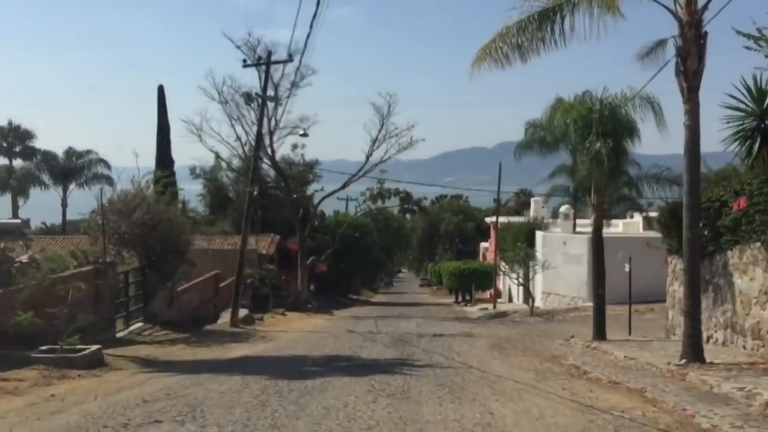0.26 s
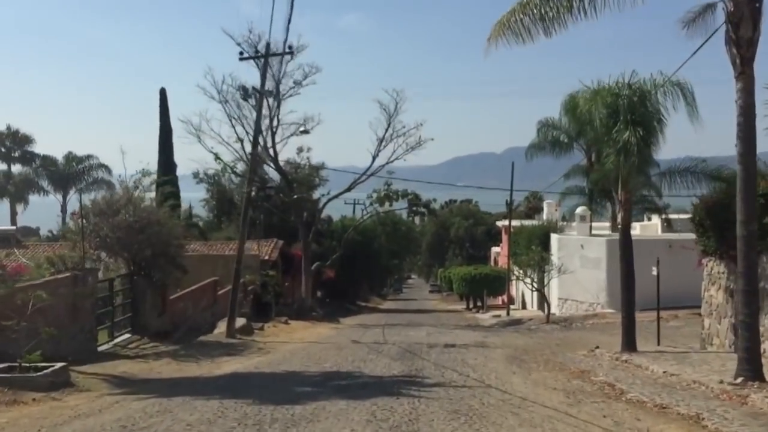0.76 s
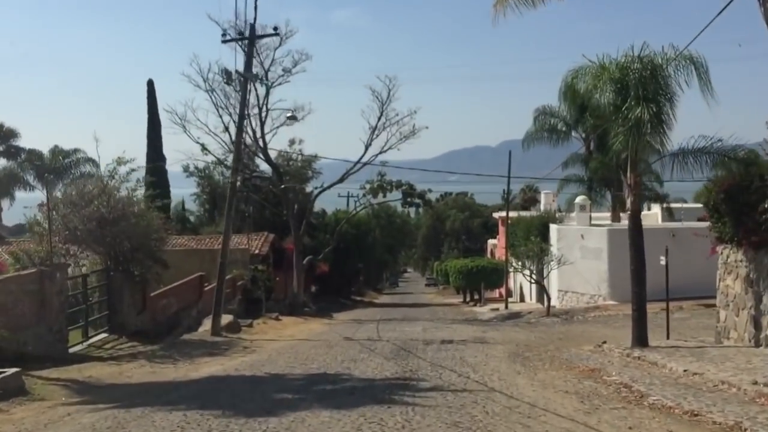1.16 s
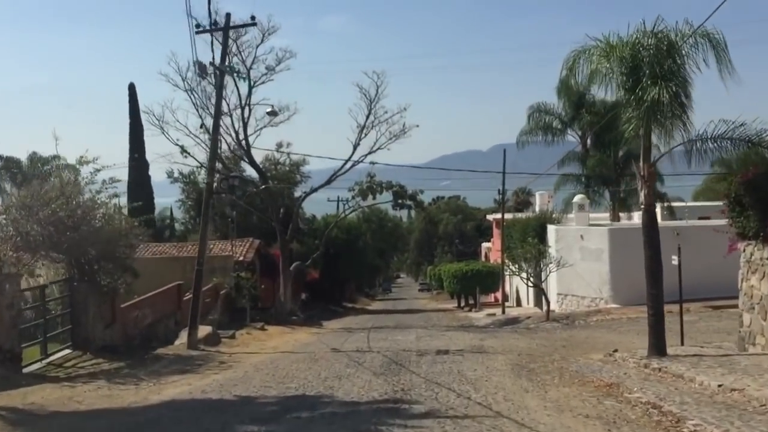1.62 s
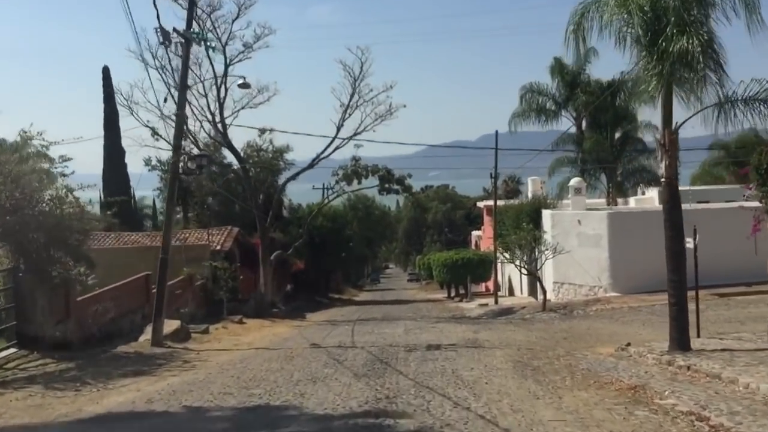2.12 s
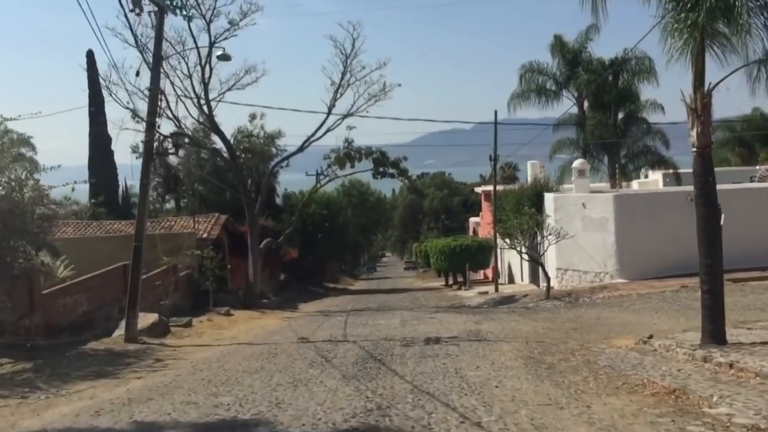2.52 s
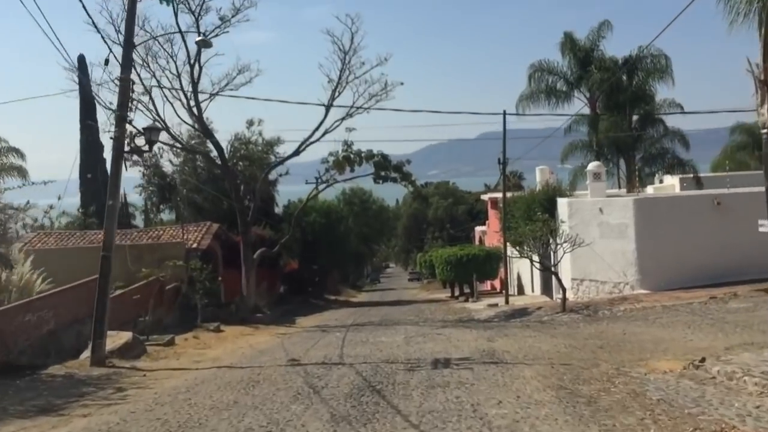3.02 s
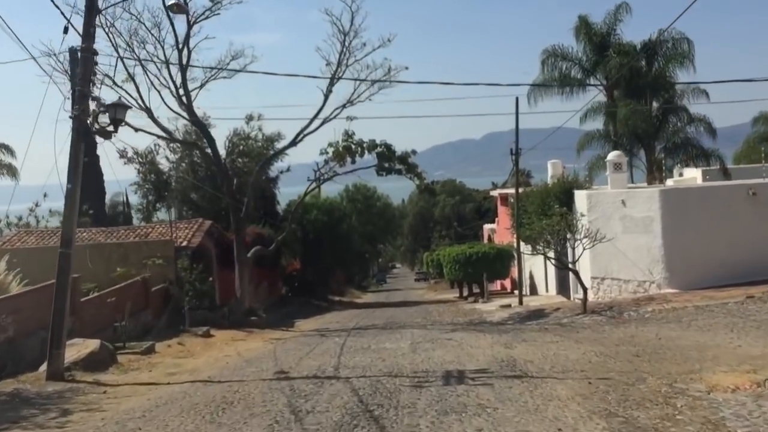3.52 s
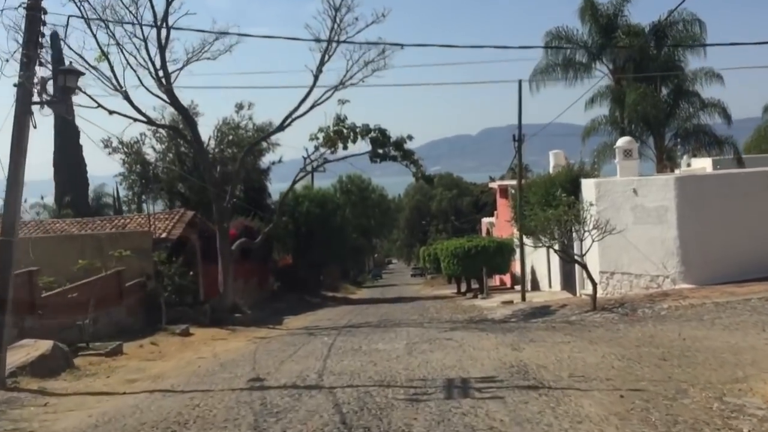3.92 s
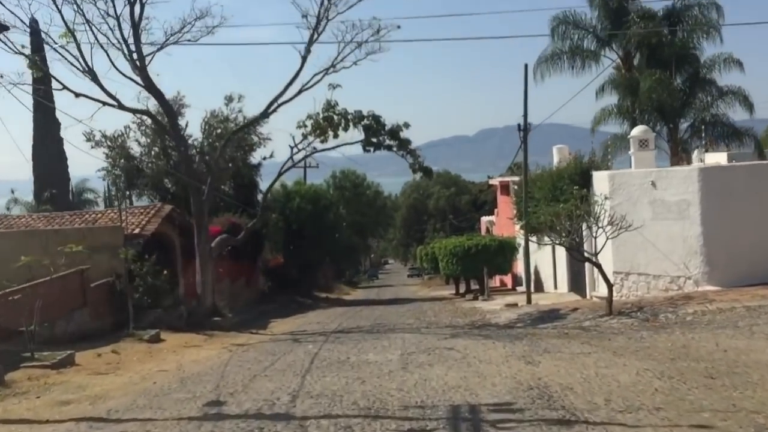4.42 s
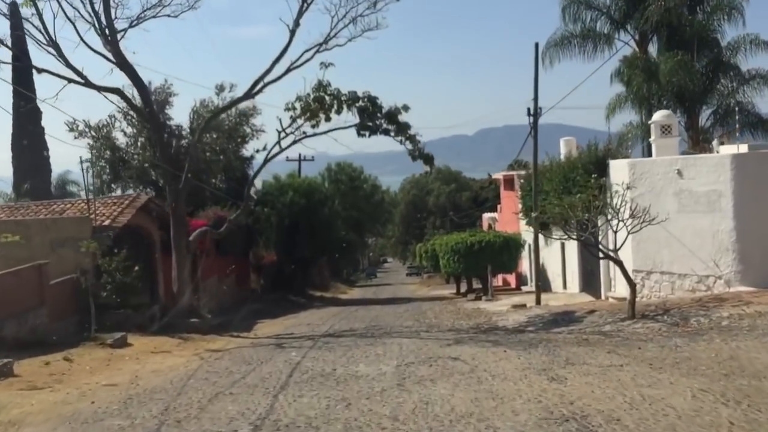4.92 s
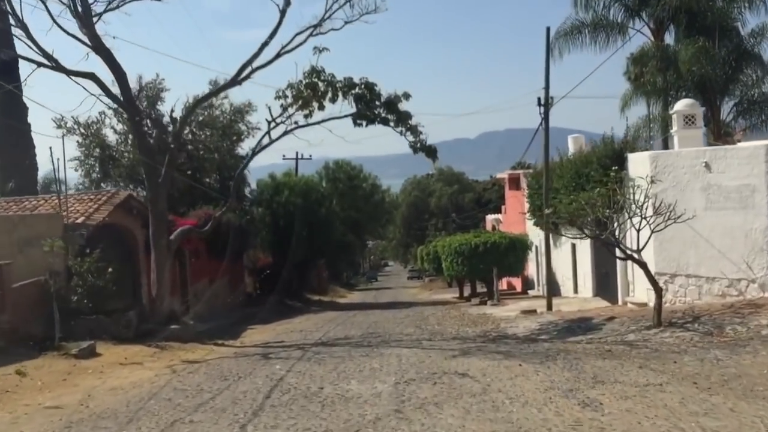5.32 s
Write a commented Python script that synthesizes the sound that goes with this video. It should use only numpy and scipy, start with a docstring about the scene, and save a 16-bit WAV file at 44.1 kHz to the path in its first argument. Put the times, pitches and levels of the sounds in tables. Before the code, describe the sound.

Slow drive on a cobbled street heard in the cabin: deep uneven tyre rumble, ticking loose trim, a few faint birds outside.

```python
"""A car rolls slowly over cobbles, heard from inside: stone blows, as random impulses, boom, thud and roar.
Narrow resonances add the drone of the cabin air and the note of the tyre cavities.
Plastic trim taps and chatters as noise bursts and decaying modes, loose things scrape, small metal tinks.
Birds whistle and chirp outside in gliding tones, echoed by the road and house fronts; faint steady hiss."""
import sys
import numpy as np
from scipy import signal
from scipy.fft import rfft, irfft, next_fast_len
from scipy.io import wavfile
from scipy.ndimage import uniform_filter1d, map_coordinates

SR = 44100
rng = np.random.default_rng(int(sys.argv[2]) if len(sys.argv) > 2 else 0)


def wrap_up_sound(samples):
    """Save the sound to the file named by the first command line argument, as 16-bit audio."""
    columns = np.atleast_2d(samples).T
    # keep every value between -1 and 1, then stretch to whole-number steps
    tamed = np.clip(columns, -1, 1)
    steps = np.round(tamed * 32767).astype(np.int16)
    wavfile.write(sys.argv[1], SR, steps)


N = 245047

# Steady air and microphone noise. Each row: frequency in Hz, relative dB per Hz.
HISS_SPECTRUM = [(2000, -4.5), (4000, -10.5), (6500, -4), (10000, -5), (15500, -13)]

# Songs. Each row: whistle start in seconds, relative level in dB, opening over whistle in dB, pitch ratio.
SONGS = [(-0.04, -50, 0, 1.03), (0.24, -50.5, 2.5, 1.02), (0.508, -53, 3, .985)]
# Song opening: a high two-voiced tone, a flick, a downward slur. Each row: start after the whistle
# in seconds, length in seconds, first, middle and last pitch in Hz, relative level in dB, roughness 0-1.
OPENING_NOTES = [(-.078, 0.053, 5380, 5414, 5560, -10.5, 0.15), (-.062, .05, 7680, 7740, 7760, -23, 0.4),
                 (-.046, .016, 7650, 7350, 7050, -18, .6), (-.037, .018, 5950, 5750, 5500, -18.5, 0.4),
                 (-.029, .014, 4850, 4650, 4500, -14, .5), (-.012, .021, 4550, 4330, 4100, -9.5, 0.4)]
# Rest of the song: rising whistle, held top, buzz, softer second rise. Rows as in OPENING_NOTES.
WHISTLE_NOTES = [(-.004, .106, 2440, 2630, 3130, 0, .05), (.095, .055, 3100, 3110, 3100, -15, .25),
                 (.104, .034, 3750, 4050, 4380, -10, .75), (.152, .09, 2860, 3010, 3280, -12, .35)]
# Falling two-voiced chirp of a second bird. Rows as in OPENING_NOTES, start counted from the chirp.
CHIRP_NOTES = [(0, .028, 5350, 5480, 5620, -5, .15), (.02, .02, 3700, 4050, 4800, -3, .6),
               (.028, .036, 5220, 5150, 5050, 4.5, .2), (.04, .12, 4800, 3850, 3150, 1.5, .9)]
# Chirps. Each row: start in seconds, relative level in dB.
CHIRPS = [(0.641, -72), (1.512, -68), (2.315, -70.5), (3.04, -72), (3.83, -70.5), (4.7, -79), (5.484, -76)]
# Sharp chips. Each row: start in seconds, middle pitch in Hz, relative level in dB,
# share the pitch falls on each side of the middle.
CHIPS = [(3.789, 6300, -55.5, .3), (4.785, 3190, -53.5, 0.068)]
CHIP_S, CHIP_ROUGHNESS = 0.018, 0.75
NOTE_DB_PER_OCTAVE = 9  # louder as the pitch climbs
WAVER_KNOTS_PER_S, WAVER_PITCH_SHARE, FLUTTER_DB = 110, .006, 2.8  # unsteady pitch and level
# Echoes from house fronts. Each row: delay in seconds, level in dB.
WALLS = [(0.039, -17), (0.086, -20), (0.12, -21)]
GROUND_DELAY_S, GROUND_DB = .0038, -8.5  # bounce off the road: gliding notes swell and dip

# Taps of small metal. Each row: start in seconds, relative level in dB.
TINKS = [(2.32, -74), (3.451, -59), (4.107, -65), (4.702, -66.5), (5.176, -67.5), (5.23, -71)]
# Modes of the metal piece. Each row: frequency in Hz, relative level in dB, t60 in seconds.
METAL_MODES = [(8400, -15, .05), (8860, -2.5, 0.072), (8900, -10, .06), (12300, -17.5, .03),
               (15450, -18.5, .03)]

# Slide of a loose object. Each row: time in seconds, relative level in dB.
SLIDE_LEVEL = [(2.97, -75), (3.0, -49), (3.03, -51), (3.065, -55), (3.105, -47), (3.12, -66), (3.16, -71.5)]
# Brief rubs of loose things. Each row: middle in seconds, length in seconds, relative peak level in dB.
SCUFFS = [(1.126, 0.079, -68), (2.706, 0.064, -68.5), (3.864, 0.089, -56.5), (4.1, 0.22, -70),
          (4.977, .05, -60.5), (5.37, 0.035, -61.5)]
# Scraping on plastic. Each row: frequency in Hz, relative dB per Hz.
SCRAPE_SPECTRUM = [(1200, -30.5), (2400, 2), (3400, -1), (5300, -7), (7000, -11.5), (9000, -12.5),
                   (12000, -24), (15500, -23.5)]

# Ticks of loose fittings. Each row: frequency in Hz, relative dB per Hz.
TICK_SPECTRUM = [(500, -15), (1400, 10), (2100, -2), (2800, -9), (3600, -9), (5500, -15), (8000, -26),
                 (15000, -32)]
CHATTER_DB = -81  # on smooth cobbles
CHATTER_DB_PER_ROAR_DB, CHATTER_ROAR_LIMIT_DB = 3.75, 5.5  # grows with the roar's rise, up to the limit

# Trim contacts. Each row: start in seconds, relative levels of crack, knock and snap in dB,
# ring of the struck spot in Hz, relative level of that ring in dB.
TRIM_CONTACTS = [(0.0385, -51, -38, -86, 1820, -43), (0.0558, -36, -38, -51.5, 1780, -45),
                 (0.0603, -44, -34, -72, 1800, -36.5), (0.3882, -46, -57, -70, 3260, -54),
                 (0.2162, -49, -49, -76, 1860, -42.5), (0.3931, -34, -25.5, -68, 2700, -41),
                 (0.4274, -47, -34, -69, 1120, -41), (0.6757, -50.5, -35.5, -80, 4600, -75),
                 (0.819, -53, -44.5, -70, 1720, -53), (0.848, -48.5, -42, -74, 1980, -47),
                 (1.1997, -47, -33, -69, 1900, -40.5), (1.284, -52, -37, -95, 1710, -55),
                 (1.5736, -42, -32.5, -80, 1940, -43), (1.6062, -55, -44, -79, 2680, -53.5),
                 (1.709, -52, -35.5, -82, 1340, -41.5), (2.122, -39.5, -29, -61.5, 2130, -49),
                 (2.7503, -39, -40.5, -61.5, 2670, -63), (2.887, -47, -51, -64, 2880, -45.5),
                 (2.9276, -44, -48, -68, 1470, -53), (2.9658, -45.5, -30, -86, 1500, -47),
                 (2.9998, -46, -33, -55, 2290, -44), (3.0285, -44, -53, -56, 2200, -47),
                 (3.1008, -41, -53, -68, 3030, -41), (3.3767, -34.5, -29.5, -62, 1560, -45),
                 (3.4131, -41.5, -34, -79, 2380, -49), (3.4515, -45.5, -47, -76, 1350, -48),
                 (3.489, -36, -55, -52.5, 1830, -40), (3.5336, -44, -40, -65, 2110, -52),
                 (3.55, -46, -33, -71, 3030, -48), (3.558, -45, -47, -63, 4080, -50),
                 (3.5778, -32.5, -50, -51.5, 1850, -50), (3.6237, -42, -54, -74, 1550, -52),
                 (3.791, -56, -56, -54, 4700, -64), (3.8533, -39.5, -31.5, -54, 1850, -46),
                 (4.0138, -53, -35, -68, 2830, -49), (4.092, -53, -29, -80, 1146, -55),
                 (4.1794, -39, -39, -60.5, 2140, -56), (4.5542, -37.5, -40, -67.5, 3540, -52),
                 (4.558, -39, -30.5, -76, 1520, -44), (4.592, -51.5, -33, -81, 1180, -42),
                 (4.6275, -56, -32, -84, 1380, -46), (4.6939, -42.5, -35, -53.5, 1900, -41),
                 (4.812, -51, -49, -60.5, 2690, -52.5), (4.8853, -47, -40.5, -63, 2120, -49.5),
                 (4.952, -51, -31.5, -74, 2720, -52), (4.969, -53, -44, -63, 1340, -48),
                 (4.988, -44, -31.5, -70.5, 1160, -44), (5.0231, -41.5, -30, -87.5, 1180, -45.5),
                 (5.053, -53, -45.5, -74, 1370, -45), (5.0986, -40.5, -25.5, -76.5, 1390, -46),
                 (5.112, -49.5, -53.5, -68, 1380, -54), (5.3684, -47.5, -41, -69, 3050, -52.5)]
# Modes of the plastic panels. Each row: frequency in Hz, relative level in dB, t60 in seconds.
PANEL_MODES = [(1340, -6, 0.039), (1660, 1, 0.079), (2023, 5, 0.021), (2130, -9.5, 0.0068),
               (3030, -3.5, 0.013), (3900, -4.5, 0.018), (4330, 3, 0.0032), (4720, -26.5, 0.005)]
# Hard part of a contact. Each row: frequency in Hz, relative level in dB.
CRACK_SPECTRUM = [(600, -18), (1400, 8.5), (2400, 2), (3300, -6.5), (4500, -8), (7000, -42.5)]
# Dull part of a contact. Each row: frequency in Hz, relative level in dB.
KNOCK_SPECTRUM = [(150, -34.5), (350, 15.5), (850, -3), (1300, -8), (2500, -68)]
# Bright part of a contact. Each row: frequency in Hz, relative level in dB.
SNAP_SPECTRUM = [(2500, -23), (4400, 3), (6300, 2), (8000, -7.5), (11000, -9.5), (13000, -13),
                 (16000, -29.5)]
CONTACT_T60_S = .004  # first instant of a tap
STRIKE_TRAVEL_S, STRIKE_HZ = .0014, 1000  # travel time through the panel at this pitch
STRIKE_DB = 20  # gain of the strike impulse, mixed with unit noise
REBOUND_MIN_S, REBOUND_MAX_S, REBOUND_DB = .0015, .005, -5  # panel touches once more
SPOT_SPACING_HZ, SPOT_DB = 550, 2.8  # each struck spot favours its own bands
BUZZ_KNOTS_PER_S, BUZZ_DB = 600, 3  # unevenness as panels buzz against each other
# Resonances of trim and glass. Each row: frequency in Hz, width in Hz, boost in dB (1 dB cut overall).
CABIN_RESONANCES = [(864, 66, 4.5), (1160, 33, 2), (2100, 100, 1.5), (2170, 110, 3), (2740, 110, 2),
                    (4250, 230, 3)]

# Drone of the cabin air. Each row: time in seconds, relative level in dB.
DRONE_LEVEL = [(0, -34.5), (.4, -32), (1, -35), (1.4, -35.5), (1.75, -30.5), (2.3, -33), (2.6, -29),
               (3.15, -32.5), (3.6, -30.5), (4.1, -28.5), (4.9, -30), (5.3, -31), (5.56, -23.5)]
DRONE_HZ, DRONE_WIDTH_HZ, DRONE_JOLT_SHARE = 95.9, 20, 0.7  # share of a jolt's dB it takes
# Ring of the air inside the tyres. Each row: time in seconds, relative level in dB.
CAVITY_LEVEL = [(0, -46), (0.5, -38), (0.9, -47.5), (1.4, -55.5), (2.0, -41), (2.7, -53.5), (3.5, -50.5),
                (4.2, -50), (5.1, -43), (5.56, -49.5)]

# Stretches of rough stones. Each row: middle in seconds, length in seconds,
# rise of the tyre roar in dB, rise of the floor thud in dB.
ROUGH_PATCHES = [(-0.006, 0.5, 8, 10), (0.433, 0.21, 3, 3.5), (0.796, 0.26, 4, 6.5), (1.197, 0.51, 0, 1),
                 (1.602, 0.37, 2, 2.5), (2.029, 0.26, 3.5, 3.5), (2.965, 0.34, 4, 5), (3.546, 0.52, 5.5, 7),
                 (4.101, 0.52, 5, 6.5), (4.596, 0.78, 3, 2.5), (4.975, 0.67, 5, 1.5)]
# High stones that jolt the body. Each row: middle in seconds, rise of the boom in dB.
JOLTS = [(0.03, 5.5), (1.73, 3.5), (2.562, 4), (3.381, 5), (4.042, 7), (4.283, 8), (4.489, 4.5), (4.664, 8),
         (4.891, 4), (5.06, 7), (5.179, 6.5), (5.516, 1)]
# Dull bumps of the suspension. Each row: middle in seconds, rise of the floor thud in dB.
BUMPS = [(1.359, 10.5), (1.46, 7.5), (1.993, 8), (3.58, 5.5), (3.86, 3), (3.96, 1.5), (4.089, 9.5),
         (4.16, 3.5), (4.66, 5), (4.75, 6.5)]
JOLT_S, BUMP_S = 0.1, 0.049  # lengths
# Boom of the body. Each row: time in seconds, level in dB.
BOOM_LEVEL = [(0, -27), (0.7, -27.5), (1.35, -30.5), (1.7, -27.5), (2.25, -27), (2.85, -30), (3.6, -26.5),
              (4.2, -28.5), (5.56, -27.5)]
# Modes of the body on its springs. Each row: frequency in Hz, width in Hz, relative level in dB.
BODY_MODES = [(35.5, 15, -7), (52.4, 17.7, -1.5), (75.7, 14, -7)]
# Thud of suspension and floor. Each row: frequency in Hz, relative dB per Hz.
THUD_SPECTRUM = [(90, -14), (115, 2.5), (124, 6), (150, 2.5), (175, -1.5), (203, -1.5), (222, -5),
                 (260, -10.5), (320, -17), (460, -78)]
# Tread on stone. Each row: frequency in Hz, relative dB per Hz.
ROAR_SPECTRUM = [(190, -27), (310, 3.5), (400, 3), (510, -4.5), (700, -8.5), (880, -12), (1020, -13),
                 (1300, -16), (1650, -20.5), (2400, -31.5), (3300, -37), (4400, -43.5), (7000, -49),
                 (14000, -73.5)]
ROAR_DB, THUD_DB = -49.5, -37.5  # on smooth cobbles
TOP_HZ = 15720  # band limit


def amp(db):
    """Decibels to gain."""
    return 10 ** (np.asarray(db) / 20)


def unit(x):
    """Scale to rms 1."""
    return x / np.sqrt(np.mean(x ** 2) + 1e-20)


def curve(rows):
    """Interpolate (s, value) rows to one value per sample."""
    times_s, values = np.transpose(rows)
    return np.interp(np.arange(N) / SR, times_s, values)


def wobble(knots_per_s):
    """Smooth random curve through normal knots."""
    knots = rng.standard_normal(int(N * knots_per_s / SR) + 4)
    return map_coordinates(knots, [np.arange(N) * knots_per_s / SR])


def swells(rows):
    """Sum of smooth humps, one for each (middle s, length s, height)."""
    t = np.arange(N) / SR
    return sum(height * np.cos(np.pi * np.clip((t - middle_s) / length_s, -.5, .5)) ** 2
               for middle_s, length_s, height in rows)


def filtered(x, response):
    """Multiply the spectrum of x by a response of frequency in Hz."""
    m = next_fast_len(len(x) + SR // 4)
    return irfft(rfft(x, m) * response(np.fft.rfftfreq(m, 1 / SR)), m)[:len(x)]


def coloured(x, spectrum):
    """Shape x by (Hz, dB) points, interpolated over log frequency, at rms 1."""
    f, db = np.transpose(spectrum)
    return unit(filtered(x, lambda hz: amp(np.interp(np.log(hz + 1), np.log(f), db))))


def steadied(x, span_s):
    """Even out swells slower than the span."""
    power = np.abs(uniform_filter1d(x * x, max(int(span_s * SR), 1)))
    return x / np.sqrt(power + 1e-6)


def patchy(x, depth_db, size=1024):
    """Random gain patches in time and frequency; a smaller size makes them briefer and wider."""
    z = signal.stft(x, nperseg=size)[2]
    field = uniform_filter1d(rng.standard_normal(z.shape), size=4, axis=0)
    field = uniform_filter1d(field, size=5, axis=1)
    return signal.istft(z * amp(depth_db * unit(field)), nperseg=size)[1][:len(x)]


def blows(per_s, spread_db):
    """Impulses at random moments, log-normal sizes, random signs, rms 1."""
    hit = rng.random(N) < per_s / SR
    sign, size = rng.standard_normal((2, N))
    return unit(hit * np.sign(sign) * amp(spread_db * np.clip(size, -2, 2)))


def add(track, start_s, sound):
    """Mix a sound into the track, cut to its ends."""
    start = round(start_s * SR)
    part = sound[max(-start, 0):max(N - start, 0)]
    track[max(start, 0):][:len(part)] += part


def steady_hiss():
    """Air and microphone noise: shaped white noise at constant level."""
    return amp(-86.0) * coloured(rng.standard_normal(N), HISS_SPECTRUM)


def bird_notes():
    """Songs and chirps repeat their own sets of notes; a chip is one short falling note."""
    calls = [(s, db + opening_db, pitch, OPENING_NOTES) for s, db, opening_db, pitch in SONGS]
    calls += [(s, db, pitch, WHISTLE_NOTES) for s, db, _, pitch in SONGS]
    calls += [(s, db, 1, CHIRP_NOTES) for s, db in CHIRPS]
    notes = []
    for s, db, pitch, call in calls:
        for after_s, length_s, *hz, level_db, rough in call:
            notes.append((s + after_s, length_s, *(pitch * np.array(hz)), db + level_db, rough))
    for s, hz, db, fall in CHIPS:
        notes.append((s, CHIP_S, hz * (1 + fall), hz, hz * (1 - fall), db, CHIP_ROUGHNESS))
    return notes


def birds(rasp_knots_per_s):
    """Gliding, wavering tones; fast random flutter widens harsh notes into a narrow band."""
    out = np.zeros(N)
    for s, length_s, first_hz, middle_hz, last_hz, db, rough in bird_notes():
        u = np.linspace(0, 1, max(int(length_s * SR), 8))
        rates = rasp_knots_per_s, rasp_knots_per_s, WAVER_KNOTS_PER_S, WAVER_KNOTS_PER_S
        rasp_sin, rasp_cos, waver, flutter = [
            map_coordinates(rng.standard_normal(256), [u * length_s * rate], mode="mirror")
            for rate in rates]
        glide_hz = np.polyval(np.polyfit([0, .5, 1], [first_hz, middle_hz, last_hz], 2), u)
        glide_hz = glide_hz * (1 + WAVER_PITCH_SHARE * waver)
        phase = 2 * np.pi * np.cumsum(glide_hz) / SR
        pure = np.sqrt(2 * (1 - rough)) * np.sin(phase)
        harsh = np.sqrt(rough) * (rasp_sin * np.sin(phase) + rasp_cos * np.cos(phase))
        effort_db = NOTE_DB_PER_OCTAVE * np.log2(glide_hz / middle_hz) + FLUTTER_DB * flutter
        envelope = np.sqrt(np.abs(np.sin(np.pi * u)))
        add(out, s, amp(db + effort_db) * envelope * (pure + harsh))
    return out


def street(x, wet_db):
    """One bounce off the road, then house-front echoes and a diffuse tail."""
    t = np.arange(SR) / SR
    x = x + amp(GROUND_DB) * np.pad(x, (round(GROUND_DELAY_S * SR), 0))[:N]
    tail = rng.standard_normal(SR) * amp(-60 * t / .45) * (1 - np.exp(-t / .015))
    out = x + amp(wet_db) * signal.fftconvolve(x, tail / np.linalg.norm(tail))[:N]
    for delay_s, db in WALLS:
        add(out, delay_s, amp(db) * x)
    return out


def tinks():
    """Tapped metal: decaying sine modes, their balance random at each tap."""
    out, t = np.zeros(N), np.arange(SR // 6) / SR
    for s, db in TINKS:
        for hz, mode_db, t60_s in METAL_MODES:
            level_db = db + mode_db + rng.normal(0, 2.3)
            add(out, s, amp(level_db - 60 * t / t60_s) * np.sin(2 * np.pi * hz * t))
    return out


def slide():
    """A loose object skids over plastic in clumps of tiny slips; brief scuffs besides."""
    slips = amp(2.6 * wobble(200)) * (blows(per_s=1500, spread_db=4) + .5 * rng.standard_normal(N))
    pressure = amp(curve(SLIDE_LEVEL))
    pressure = pressure + swells((s, length_s, amp(db)) for s, length_s, db in SCUFFS)
    return amp(-7.0) * pressure * coloured(patchy(slips, depth_db=3.5, size=256), SCRAPE_SPECTRUM)


def chatter(rough_db, per_s):
    """Loose fittings tick faintly as short noise rings, louder on rough stones."""
    t = np.arange(SR // 30) / SR
    ring = rng.standard_normal(len(t)) * amp(-60 * t / .025) * (1 - np.exp(-t / .0015))
    ticks = signal.fftconvolve(blows(per_s, spread_db=3), ring)[:N]
    level_db = CHATTER_DB + CHATTER_DB_PER_ROAR_DB * np.minimum(rough_db, CHATTER_ROAR_LIMIT_DB)
    return amp(level_db) * coloured(patchy(ticks, depth_db=4.5, size=512), TICK_SPECTRUM)


def spot_colour(x):
    """Broad random peaks and dips, new at each call."""
    peaks = rng.standard_normal(64)
    return filtered(x, lambda hz: amp(
        SPOT_DB * map_coordinates(peaks, [hz / SPOT_SPACING_HZ], mode="mirror")))


def trim(knock_t60_s, snap_t60_s, crack_t60_s, ring_t60_s):
    """Panels tap: a crack with short modes, the struck spot's ring, a dull knock and a bright snap."""
    out, t = np.zeros(N), np.arange(SR // 8) / SR
    mode_hz, mode_db, mode_t60_s = np.transpose(PANEL_MODES)[:, :, None]

    def bending(f):
        """Dispersion of bending waves: highs cross the panel first."""
        return np.exp(-4j * np.pi * STRIKE_TRAVEL_S * np.sqrt(STRIKE_HZ * f))

    strike = amp(STRIKE_DB) * filtered(1.0 * (t == 0), bending)
    onset = 1 - np.exp(-(t / .00035) ** 2)

    def fade(t60_s, linger_db):
        """Contact instant, main decay and a lingering tail."""
        decays = amp(-60 * t / CONTACT_T60_S) + amp(-60 * t / t60_s) + amp(linger_db - 60 * t / .09)
        return decays * onset

    def sized(x):
        """Scale to the energy of rms 1 over 5 ms."""
        return x / np.sqrt(np.sum(x * x) / (SR * .005))

    for s, crack_db, knock_db, snap_db, ring_hz, ring_db in TRIM_CONTACTS:
        detune, strength, phase = rng.standard_normal((3, len(PANEL_MODES), 1))  # new spot
        buzz_knots = rng.standard_normal(128)
        buzz = amp(BUZZ_DB * map_coordinates(buzz_knots, [t * BUZZ_KNOTS_PER_S], mode="mirror"))
        rebound_s = rng.uniform(REBOUND_MIN_S, REBOUND_MAX_S)
        rebound = amp(REBOUND_DB) * np.roll(strike, round(rebound_s * SR))
        scatters = rng.standard_normal((3, len(t)))
        hard, dull, bright = [spot_colour(scatter * buzz + strike + rebound) for scatter in scatters]

        modes = amp(mode_db + 2 * strength - 60 * t / mode_t60_s)
        modes = modes * np.sin(2 * np.pi * (mode_hz * (1 + 0.032 * detune) * t + phase))
        crack = coloured(hard, CRACK_SPECTRUM) * fade(crack_t60_s, linger_db=-3)
        knock = coloured(dull, KNOCK_SPECTRUM) * fade(knock_t60_s, linger_db=-26.0)
        snap = coloured(bright, SNAP_SPECTRUM) * fade(snap_t60_s, linger_db=-16.0)
        ring = amp(-60 * t / ring_t60_s) * np.sin(2 * np.pi * ring_hz * t)
        add(out, s, amp(crack_db - 10.0) * (sized(crack) + 0.51 * sized(modes.sum(0) * onset)))
        add(out, s, amp(ring_db - 3.5) * ring)
        add(out, s, amp(knock_db - 9.0) * sized(knock))
        add(out, s, amp(snap_db - 4.0) * sized(snap))
    return out


def cabin(x):
    """Trim and glass favour a few narrow bands."""
    return filtered(x, lambda f: amp(sum(
        db / (1 + (2 * (f - hz) / width_hz) ** 2) for hz, width_hz, db in CABIN_RESONANCES) - 1.0))


def cabin_drone():
    """Stone blows keep the lowest resonance of the cabin air ringing."""
    ring = filtered(blows(per_s=240, spread_db=0.0),
                    lambda f: 1 / (1 + np.abs(2 * (f - DRONE_HZ) / DRONE_WIDTH_HZ) ** 3.5))
    jolt_db = DRONE_JOLT_SHARE * swells((s, JOLT_S, db) for s, db in JOLTS)
    return amp(curve(DRONE_LEVEL) + 0.5 + jolt_db) * steadied(unit(ring), span_s=0.12)


def tyre_cavity(hz, half_width_hz):
    """The ring of air in the tyres sings one narrow note: band-passed noise."""
    ring = filtered(rng.standard_normal(N), lambda f: 1 / (1 + ((f - hz) / half_width_hz) ** 4))
    return amp(curve(CAVITY_LEVEL) - 1.0) * steadied(unit(ring), span_s=0.24)


def road_surface():
    """Rise in dB of roar and thud over the rough stretches."""
    roar_rise_db = swells((s, length_s, roar_db) for s, length_s, roar_db, _ in ROUGH_PATCHES)
    thud_rise_db = swells((s, length_s, thud_db) for s, length_s, _, thud_db in ROUGH_PATCHES)
    return roar_rise_db, thud_rise_db


def body_boom():
    """Stone blows excite the low modes of the body on its springs."""
    def body(f):
        low_cut = 1 - 1 / (1 + (f / 31) ** 6)
        return low_cut * sum(amp(db) / (1 + np.abs(2 * (f - hz) / width_hz) ** 5.4)
                             for hz, width_hz, db in BODY_MODES)

    level_db = curve(BOOM_LEVEL) + swells((s, JOLT_S, db) for s, db in JOLTS) + 0.41 * wobble(17)
    return amp(level_db) * steadied(unit(filtered(blows(per_s=220, spread_db=1.5), body)), span_s=0.1)


def floor_thud(rise_db):
    """Stone blows thud through suspension and floor, louder on rough stones and bumps."""
    bump_db = swells((s, BUMP_S, db) for s, db in BUMPS)
    level_db = THUD_DB + rise_db + bump_db + 0.76 * wobble(22)
    thud = coloured(blows(per_s=500, spread_db=2.0), THUD_SPECTRUM)
    return amp(level_db) * steadied(thud, span_s=0.18)


def tread_roar(rough_db):
    """Tread on stone: patchy blows and noise, pulsed as each stone squeezes the rubber."""
    squeeze_db = wobble(60)
    crunch = patchy(0.77 * blows(per_s=350, spread_db=1.0) + rng.standard_normal(N), depth_db=2.5)
    tread = steadied(unit(amp(squeeze_db) * coloured(crunch, ROAR_SPECTRUM)), span_s=.07)
    return amp(ROAR_DB + wobble(13) + rough_db) * tread


def tyres(rough_db, thud_rise_db):
    """Cobbles strike the tyres: boom, thud and roar, the roar coloured by the cabin."""
    return body_boom() + floor_thud(thud_rise_db) + cabin(tread_roar(rough_db))


def scene():
    """Hiss, birds outside, rattles and road noise in the cabin, as one channel."""
    rough_db, thud_rise_db = road_surface()
    song = street(birds(rasp_knots_per_s=1500), wet_db=-7)
    taps = trim(knock_t60_s=.028, snap_t60_s=.032, crack_t60_s=.036, ring_t60_s=.038)
    rattles = taps + chatter(rough_db, per_s=79) + slide()
    road = tyres(rough_db, thud_rise_db) + cabin_drone() + tyre_cavity(hz=227.65, half_width_hz=4.7)
    return (steady_hiss() + amp(-6.5) * song + tinks() + cabin(rattles) + road)[None]


def record(dry):
    """Very short fades at both ends, then a steep low-pass at the band limit."""
    eased = dry * signal.windows.tukey(N, .0015)
    return signal.sosfilt(signal.ellip(10, .1, 80, TOP_HZ, fs=SR, output="sos"), eased)


dry = scene()
out = record(dry)
wrap_up_sound(out)
```